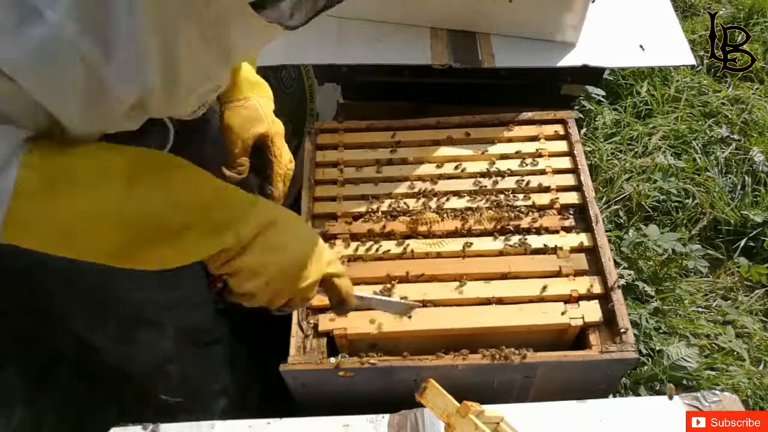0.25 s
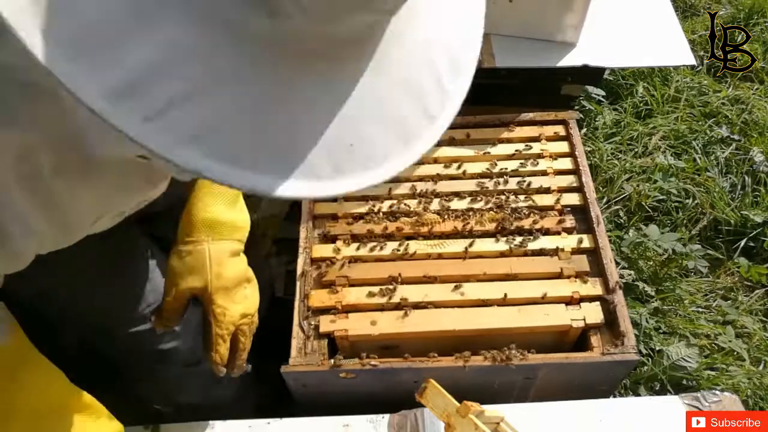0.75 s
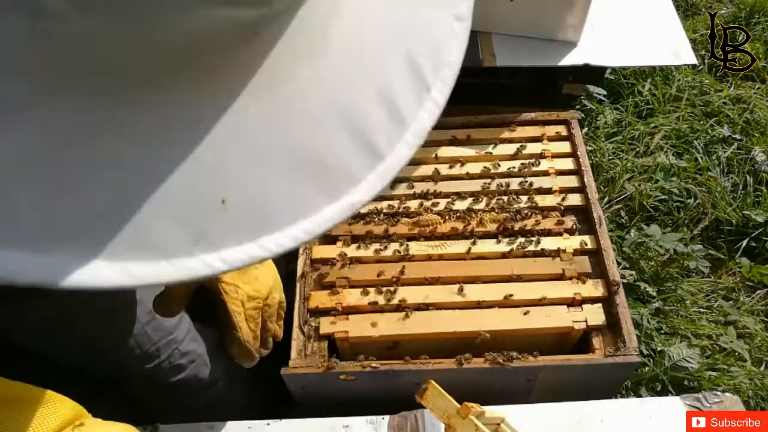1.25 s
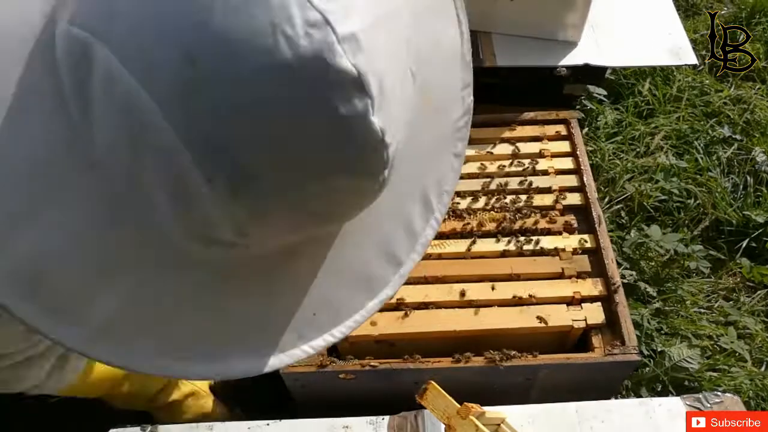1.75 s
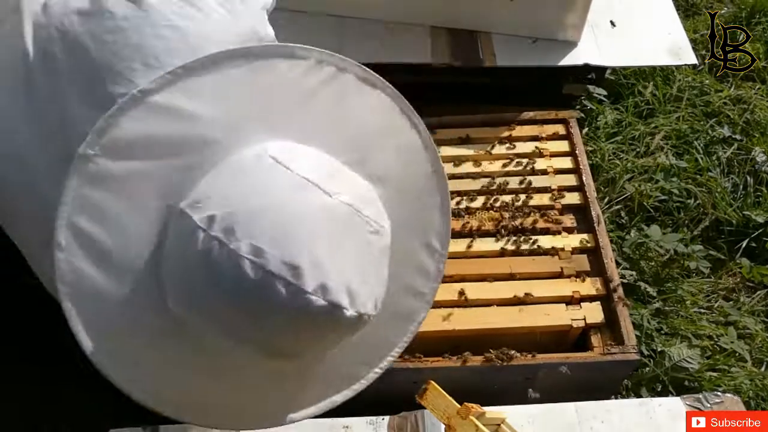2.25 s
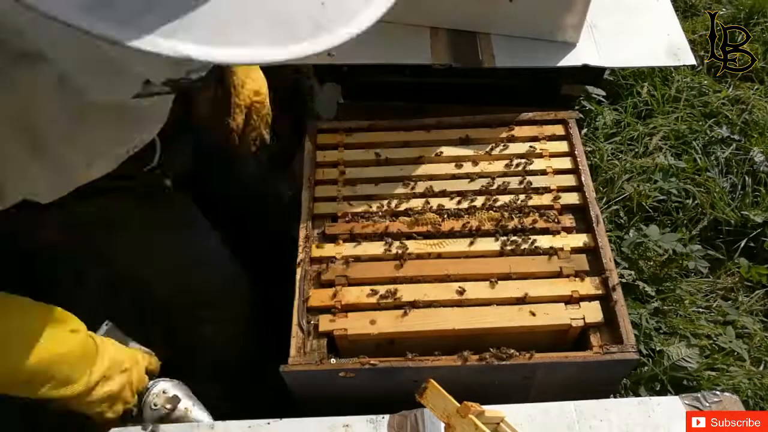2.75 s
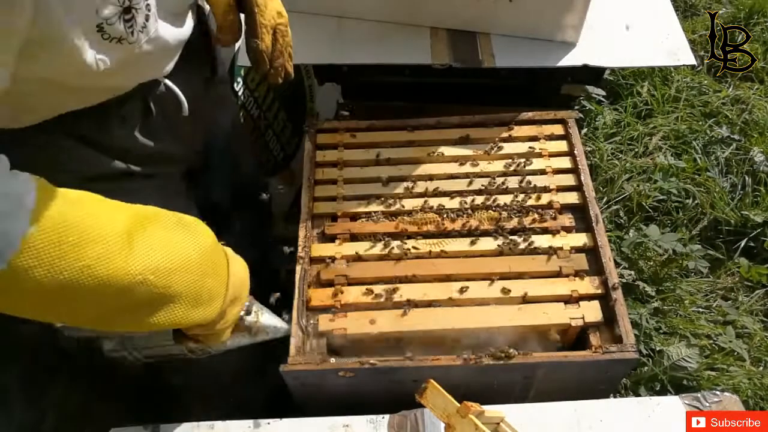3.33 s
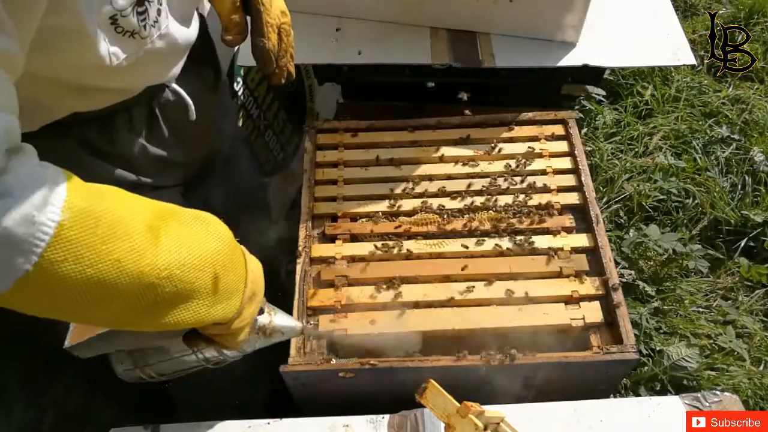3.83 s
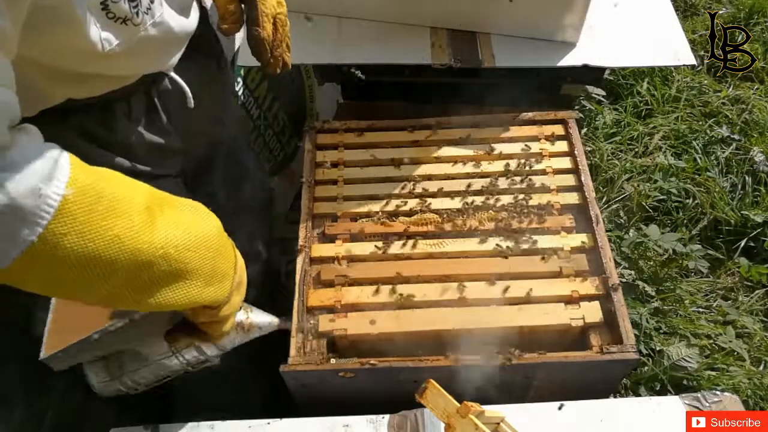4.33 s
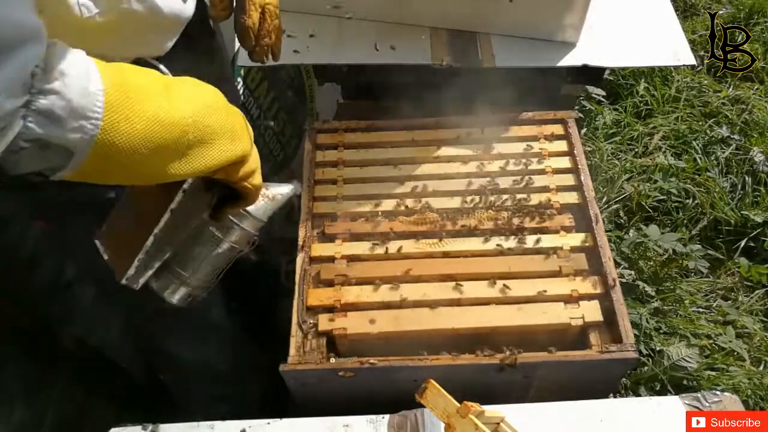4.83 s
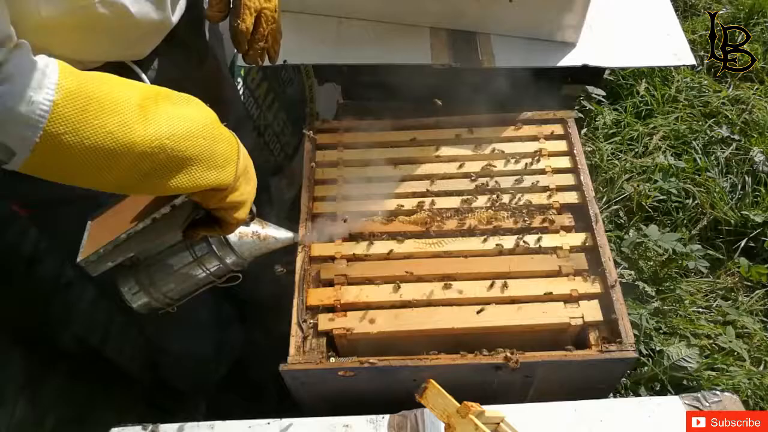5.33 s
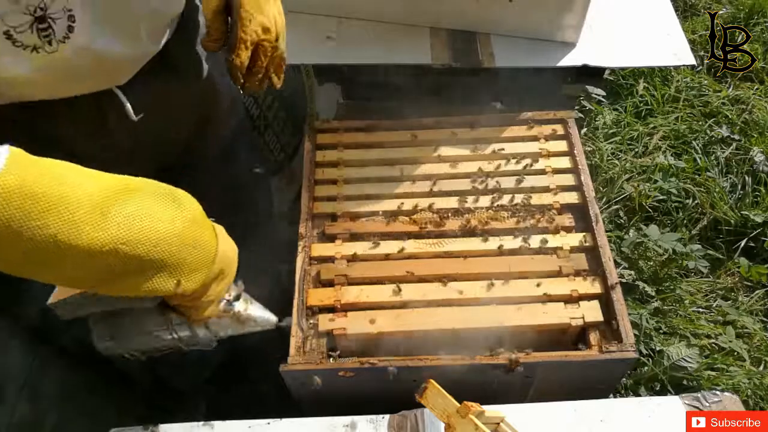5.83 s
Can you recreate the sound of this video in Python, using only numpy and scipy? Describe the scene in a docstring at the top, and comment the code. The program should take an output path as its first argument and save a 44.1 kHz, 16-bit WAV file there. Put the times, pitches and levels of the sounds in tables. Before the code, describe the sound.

Quiet garden air with a faint hive buzz. Hollow wooden knocks come first, then a sharp steel clatter that rings for a moment. Two seconds later a smoker is pumped quickly nine times, whooshing through its spout with rumbling bellows and soft air intake between. The colony answers with a growing fine hiss, and one bee hums past faintly near the end. Close microphones, dry and open.

```python
"""Outdoors at an open beehive, a steel hive tool bumps the wooden frames and drops on a lid, clattering and ringing.
A bellows smoker is then pumped nine times: each squeeze is a rumble and a jet of turbulent noise through a
resonant spout. Its leather buckles softly and its hinge creaks around the second squeeze.
The colony answers the smoke with a rising noise hiss and a soft buzz, and one bee passes close as a
wavering tone, over the steady filtered noise of a quiet garden."""
import sys
import numpy as np
from scipy import signal
from scipy.fft import rfft, irfft, next_fast_len
from scipy.io import wavfile
from scipy.ndimage import map_coordinates

SR = 44100
rng = np.random.default_rng(int(sys.argv[2]) if len(sys.argv) > 2 else 0)


def to_wav(sig):
    """Store sig (one row per channel, or 1-D mono) as 16-bit WAV at the path in sys.argv[1].

    Samples outside -1..1 are clipped; the rate is SR.
    """
    pcm = np.clip(np.atleast_2d(sig), -1, 1) * 32767
    pcm = np.round(pcm).astype(np.int16)
    wavfile.write(sys.argv[1], SR, pcm.T)  # frames by channels


N = 268524  # length in samples


def amp(db):
    """Decibels to an amplitude factor."""
    return 10 ** (np.asarray(db) / 20)


def unit(x):
    """Scale to rms 1."""
    return x / np.sqrt(np.mean(x ** 2) + 1e-20)


def along(points, hz):
    """Each column of a (Hz, ..) table, read on a log frequency axis."""
    f, *cols = np.transpose(points)
    return np.array([np.interp(np.log(hz + 1), np.log(f + 1), c) for c in cols])


def wobble(rate):
    """A smooth random curve over the whole scene, rate knots a second."""
    knots = rng.standard_normal(int(N * rate / SR) + 4)
    return map_coordinates(knots, [np.arange(N) * rate / SR])


def filtered(x, response):
    """x times a response of frequency."""
    n = x.shape[-1]
    m = next_fast_len(n + 4096)  # padded against wrap-around
    return irfft(rfft(x, m) * response(np.fft.rfftfreq(m, 1 / SR)), m)[..., :n]


def noise(spectrum, field, size=N):
    """Coloured stereo noise of rms 1; the field sets how alike it reaches the two microphones."""
    hz = np.fft.rfftfreq(size, 1 / SR)
    alike, pan_db, lead = along(field, hz)
    turn = np.arccos(np.clip(alike, 0, 1)) / 2
    sources = rfft(rng.standard_normal((2, size)))
    shared, differing = sources * [np.cos(turn), np.sin(turn)] * amp(along(spectrum, hz))
    left = amp(pan_db / 2) * np.exp(.5j * lead)
    return unit(irfft(np.array([(shared + differing) * left, (shared - differing) / left]), size))


def stroke(t, length):
    """The hand's squeeze: one smooth arch, zero before and after."""
    return np.abs(np.sin(np.pi * np.clip(t / length, 0, 1)))


def add(track, s, sound):
    """Mix a sound in at time s in seconds."""
    part = track[:, round(s * SR):][:, :sound.shape[1]]
    part += sound[:, :part.shape[1]]


# How sound from the hive and smoker reaches the microphone pair.
# Each row: frequency in Hz, likeness of the two sides 0-1, left-right in dB, left lead in radians.
NEAR_FIELD = [(99, 1, -2.5, -0.06), (380, 0.92, 0, 1), (570, 0.47, 2.5, 2), (820, 0.7, 12, 2),
              (1410, 0.94, -1, 0.82), (1900, 0.88, -7.5, 1.7), (2170, 0.92, -3.5, 2), (3630, 0.54, 4, 1.5),
              (14700, 0, 0.5, 1.5)]


def ring(t, hz, t60, pan_db, phase):
    """One mode dying by 60 dB in t60 seconds, with a level and phase difference between the microphones."""
    side = np.array([[.5], [-.5]])
    lead = along(NEAR_FIELD, hz)[2]
    swing = np.sin(2 * np.pi * hz * t + phase + side * lead)
    return amp(side * pan_db) * swing * np.exp(-np.log(1000) * t / t60)


# Steel touching the lid.
# Each row: start in seconds, strength in dB, place from hook 0 to blade 1, highest Hz the contact excites.
TOOL_CONTACTS = [(1.1327, 7.5, 0, 4070), (1.1447, 0.5, 0.21, 19000), (1.152, 0.5, 0.18, 19000),
                 (1.162, -4, 0, 15000), (1.171, -3.5, 0.3, 14000), (1.2115, 3.5, 0, 855),
                 (1.2275, 2, 0.96, 18000)]
# The modes of the hive tool, levels relative to the contact's strength.
# Each row: frequency in Hz, t60 in seconds, dB struck at the hook, dB struck at the blade, left-right in dB.
STEEL_MODES = [(630, .09, -42, -53, 8), (733, 1.02, -56, -50.5, 10), (770, .3, -53, -52, 10),
               (1141, .11, -46, -34, 3), (1620, .09, -39, -42, 0), (1863, .28, -57, -48, 7),
               (2374, .19, -53, -46, 2), (2404, .19, -46, -48, 3), (2729, .3, -57, -54, 1),
               (3478, .29, -51, -51, 6), (3547, .14, -45, -59, 6), (3753, .29, -53, -51, 6),
               (4090, .1, -62, -51, 2), (4662, .27, -58, -55, 2), (4973, .31, -56, -50, 6),
               (5714, .36, -78, -53, 8), (6380, .18, -52, -56, 1), (6691, .25, -50, -60, 4),
               (8000, .13, -52, -57, 0), (8788, .15, -63, -42, 14), (9530, .14, -51, -60, 6),
               (9997, .09, -44, -52, 14), (10346, .14, -62, -35, 17), (11360, .09, -46, -48, 6),
               (11843, .13, -45, -63, 3), (13222, .12, -42, -53, 3), (14360, .13, -48, -64, -2),
               (14720, .14, -68, -52, 2)]
# The tick of steel touching the lid. Each row: frequency in Hz, relative level in dB.
CRACK_SPECTRUM = [(700, -2), (2000, -4), (4000, -12), (7500, -16), (10500, -8), (12500, -14), (15000, -15)]
# The lid's rattle. Each row: frequency in Hz, relative level in dB.
LID_SPECTRUM = [(90, -3.5), (220, 4.5), (480, -8.5), (720, 6), (980, -8), (1350, -26), (1650, -14),
                (2200, -15), (4600, -20), (7300, -26), (10300, -24), (13000, -31)]


def hive_tool():
    """The hook lands and chatters, then the blade falls; each end favours other modes of the steel."""
    out, t = np.zeros((2, N)), np.arange(SR) / SR
    knots = np.linspace(0, 1, num=250)  # seconds
    for s, db, place, top_hz in TOOL_CONTACTS:
        # each touch damps the ring before it
        out = out * np.interp(np.arange(N) / SR, [s, s + .004], [1, amp(-2.5)])
        soft = lambda hz: 1 / np.sqrt(1 + (hz / top_hz) ** 10)  # a soft contact excites less treble
        steel = 0
        for hz, t60, hook_db, blade_db, pan_db in STEEL_MODES:
            # the hook skids on the lid and roughens the ring; the blade rings more freely
            jitter = np.interp(t, knots, rng.standard_normal(len(knots)))
            skid = (.7 - 0.52 * place) * np.exp(-t / 0.33) * jitter
            level_db = hook_db + place * (blade_db - hook_db)
            phase = rng.uniform(0, 2 * np.pi) + skid
            steel = steel + amp(level_db) * soft(hz) * ring(t, hz, t60, pan_db, phase)
        crack = amp(-36.5) * noise(CRACK_SPECTRUM, NEAR_FIELD, len(t)) * np.exp(-t / 0.0021)
        rattle = amp(-44.5) * noise(LID_SPECTRUM, NEAR_FIELD, len(t)) * np.exp(-t / 0.081)
        # it buzzes against the lid until it lies still
        chatter = amp(3 * wobble(350)[:len(t)] * np.exp(-t / .06))
        onset = 1 - np.exp(-t / .0012)
        add(out, s, amp(db) * (steel + filtered(crack + rattle, soft)) * chatter * onset)
    return out


# Blows on the wooden frames, at the hive.
# Each row: start in seconds, level in dB, pitch in Hz, t60 in seconds,
# click in dB relative to the level before a common 12.5 dB cut.
WOOD_KNOCKS = [(0.565, -39, 172, 0.042, -17), (0.5968, -34, 121, 0.075, 2), (.603, -36, 274, 0.063, -24),
               (0.653, -37, 120, 0.073, -16), (0.9536, -22, 243, 0.077, -10.5),
               (0.9916, -27, 251.5, 0.088, -12), (1.131, -32.5, 196.8, 0.28, 2.5),
               (1.212, -30, 228, 0.1, -16), (3.35, -26, 204, 0.058, -41), (6.018, -34.5, 222, 0.04, -27)]
# The click of dry wood. Each row: frequency in Hz, relative level in dB.
CLICK_SPECTRUM = [(500, -5), (1200, 1), (1750, 3), (2400, -20), (3800, -19), (7000, -41)]
# The hive box's hollow answer. Each row: frequency in Hz, relative level in dB.
BOX_SPECTRUM = [(60, -13.5), (130, -2.5), (280, 3.5), (500, -15), (1500, -23.5), (4000, -43)]


def knocks():
    """Each blow gives a dry click and a short boom of two modes; the loose frames shudder in the box."""
    out, t = np.zeros((2, N)), np.arange(SR // 2) / SR
    for s, db, hz, t60, click_db in WOOD_KNOCKS:
        boom = ring(t, hz, t60, 0, 0) + amp(-13) * ring(t, 1.33 * hz, 0.56 * t60, 1, 0)
        shudder = amp(-19) * noise(BOX_SPECTRUM, NEAR_FIELD, len(t)) * np.exp(-t / .042)
        click_decay = np.exp(-t / 0.0023) + amp(-11.5) * np.exp(-t / 0.02)
        click = noise(CLICK_SPECTRUM, NEAR_FIELD, len(t)) * click_decay
        body = (boom + shudder) * (1 - np.exp(-t / 0.0029))
        add(out, s, amp(db) * (body + amp(click_db - 12.5) * click))
    return out


# Squeezes of the bellows.
# Each row: start in seconds, length in seconds, strength in dB, spout resonance in Hz,
# its height in dB, seconds until the inlet valve shuts.
PUFFS = [(3.014, 0.2, -41, 1540, 3, 0.025), (3.417, 0.15, -42.5, 1410, 4.5, 0.042),
         (3.746, .16, -40.5, 1480, 6, 0.046), (4.126, 0.16, -40, 1480, 5, 0.053),
         (4.463, .15, -39, 1440, 15, 0.029), (4.792, 0.15, -40, 1220, 16, .049),
         (5.167, 0.16, -44, 1366, 14.5, 0.052), (5.549, 0.16, -40.5, 1340, 7.5, 0.042),
         (5.866, 0.13, -42.5, 1440, 15, 0.037)]
# The jet's turbulence. Each row: frequency in Hz, relative density in dB per Hz.
JET_SPECTRUM = [(300, -55), (500, -6.5), (690, -10.5), (920, -1.5), (1120, -14), (1400, -1.5), (1800, -6),
                (2200, -21), (3200, -22), (6000, -65)]
# The rumbling bag. Each row: frequency in Hz, relative density in dB per Hz.
BELLOWS_SPECTRUM = [(60, -27), (120, -23.5), (180, -5), (250, -1.5), (340, -8), (430, -9.5), (560, -43),
                    (1000, -38)]
# The hiss of the fastest air. Each row: frequency in Hz, relative density in dB per Hz.
FIZZ_SPECTRUM = [(1200, -19), (2300, 13.5), (4200, 1), (10000, -1.5)]
RUMBLE_DB, RUMBLE_LONGER = -1.5, 1.073  # the bag over the puff's strength; its length over the puff's
FULL_STROKE_S = 0.16  # a squeeze longer than this holds the jet at full speed
SURGE_DB, SURGE_S = -7, 0.021  # as the inlet valve shuts, the jet surges and settles


def smoker():
    """Each squeeze rumbles in the bellows and drives a turbulent jet through the resonant spout."""
    jets, rumbles, t = np.zeros((2, N)), np.zeros((2, N)), np.arange(SR // 3) / SR
    for s, length, db, spout_hz, spout_db, valve_s in PUFFS:
        shut = np.maximum(t - valve_s, 0)  # seconds since the valve shut
        surge = amp(SURGE_DB) * (1 - np.exp(-shut / 0.0027)) * np.exp(-shut / SURGE_S)
        speed = np.minimum(stroke(t, length) * max(length / FULL_STROKE_S, 1), 1)
        flow = speed ** 1.32 * np.where(shut > 0, 1, amp(-1))  # air leaks until the valve shuts
        spout = lambda hz: amp(spout_db / (1 + ((hz - spout_hz) / 125) ** 2))
        air = unit(filtered(noise(JET_SPECTRUM, NEAR_FIELD, len(t)), spout))
        # the spout's note wanders with the hot smoke: the air is read at a wavering speed
        drift = np.cumsum(1 + .035 * wobble(35)[:len(t)])
        wandering = np.array([map_coordinates(side, [drift]) for side in air])
        jet = amp(-1.25) * wandering * (flow + surge)
        # only the fastest air hisses
        fizz = amp(-14) * noise(FIZZ_SPECTRUM, NEAR_FIELD, len(t)) * stroke(t - .005, length) ** 3
        bag = noise(BELLOWS_SPECTRUM, NEAR_FIELD, len(t))
        chop = unit(amp(2.5 * bag[0]))  # the trembling bag chops the jet
        add(jets, s, amp(db) * chop * (jet + fizz))
        # the bag settles just after the jet
        rumble = bag * stroke(t, RUMBLE_LONGER * length) ** 1.09
        add(rumbles, s, amp(db + RUMBLE_DB) * rumble)
    flutter = unit(amp(1.2 * wobble(170)))  # the leather flutters
    return flutter * (jets + amp(1.26 * wobble(60)) * rumbles)


def refill():
    """After each squeeze the spring opens the bellows and they draw air softly."""
    out, t = np.zeros((2, N)), np.arange(SR // 3) / SR
    draw = stroke(t, t[-1]) * np.exp(-t / 0.05)
    # Each row: frequency in Hz, relative density in dB per Hz
    inlet = [(100, 0), (550, -2.0), (1000, -11.0), (1500, 4), (2300, -18), (9000, -47)]
    for s, length, *_ in PUFFS:
        air = noise(inlet, NEAR_FIELD, len(t))
        add(out, s + length - .03, amp(-47.5) * draw * air)
    return out


# Folds of the smoker's leather buckling. Each row: start in seconds, level in dB.
LEATHER_FLAPS = [(3.142, -24.5), (3.842, -28), (4.187, -29), (4.253, -33.5), (4.862, -27.5), (5.268, -31),
                 (5.607, -30)]
FLAP_HZ, FLAP_T60_S = 247, 0.062


def flaps():
    """A fold of the leather buckles under the hand with a soft, hollow thump: one short, slow-starting mode."""
    out, t = np.zeros((2, N)), np.arange(SR // 4) / SR
    for s, db in LEATHER_FLAPS:
        add(out, s, amp(db) * ring(t, FLAP_HZ, FLAP_T60_S, 0, 0) * (1 - np.exp(-t / .004)))
    return out


# Creaks of the smoker's hinge. Each row: time of the hardest slip in seconds, strain in dB.
HINGE_CREAKS = [(3.385, -47.5), (3.472, -50)]
CREAK_RISE_DB_PER_S, CREAK_FALL_DB_PER_S = 194, 520
SLIP_HZ = 221  # mean rate of slips


def creak():
    """The bellows' hinge sticks and slips: a quick train of thin, high ticks that swells and dies."""
    now = np.arange(N) / SR
    strain = 0
    for s, db in HINGE_CREAKS:
        below_db = np.maximum(CREAK_RISE_DB_PER_S * (s - now), CREAK_FALL_DB_PER_S * (now - s))
        strain = strain + amp(db - below_db)
    slip_count = np.floor(np.cumsum(SLIP_HZ * (1 + 0.015 * wobble(40))) / SR)
    slips = np.diff(slip_count, prepend=0)
    t = np.arange(SR // 200) / SR
    ticks = signal.fftconvolve(slips * amp(1.7 * wobble(200)), np.exp(-t / 0.0024))[:N]
    # Each row of the first list: Hz, relative dB; of the second: Hz, likeness, left-right dB, lead in radians
    squeak = noise([(6000, -28), (9000, -12), (11400, -2), (14000, -18)], [(10000, 0.58, 1, 0)])
    return strain * ticks * squeak


# Glove and tool brushing the hive.
# Each row: start in seconds, length in seconds, level in dB, centre in Hz.
HIVE_SCUFFS = [(0.555, 0.018, -54.5, 1560), (0.813, 0.12, -68.5, 9100)]


def scuffs():
    """Each brush is a soft swell of friction noise, about an octave wide."""
    out, t = np.zeros((2, N)), np.arange(SR // 4) / SR
    for s, length, db, hz in HIVE_SCUFFS:
        spectrum = [(hz / 4, -22), (hz, 0), (hz * 2, -18), (hz * 4, -45)]
        friction = noise(spectrum, NEAR_FIELD, len(t))
        add(out, s, amp(db) * stroke(t, length) * friction)
    return out


PASS_S, PASS_WIDTH_S = 5.29, 0.14  # when one bee is nearest; how long it stays near (sigma)
PASS_DB = -59.5  # its level there, before its wavering
WING_HZ, WING_RISE_HZ_PER_S = 210, 75  # its mean wingbeat when nearest; it quickens as the bee climbs


def passing_bee():
    """A wavering wingbeat swells and fades as the bee passes, heard mostly in its second harmonic."""
    t = np.arange(N) / SR - PASS_S
    nearness = np.exp(-.5 * (t / PASS_WIDTH_S) ** 2)
    beat_hz = (WING_HZ + WING_RISE_HZ_PER_S * t) * (1 + .06 * wobble(150))
    phase = 2 * np.pi * np.cumsum(beat_hz) / SR
    wings = unit(np.sin(2 * phase) + 0.15 * np.sin(phase))
    return amp(PASS_DB + 3 * wobble(30)) * nearness * wings


STARTLE_S, ROUSE_S = 0.0065, 0.38  # delay of the answer to a puff; time from there to its height


def unrest():
    """How roused the colony is, 0-1: each puff stirs it by its strength, and the stir slowly fades."""
    stir = np.zeros(N)
    for s, _, db, *_ in PUFFS:
        age = np.maximum(np.arange(N) / SR - s - STARTLE_S, 0) / ROUSE_S
        stir += amp(db) * age * np.exp(-age)
    return stir / stir.max()


# The colony's hiss. Each row: frequency in Hz, relative density in dB per Hz.
HISS_SPECTRUM = [(300, -50), (700, 2), (1200, 6), (4000, 0.5), (7000, 3.5), (11000, 4), (15000, 7)]
# The colony's buzz. Each row: frequency in Hz, relative density in dB per Hz.
BUZZ_SPECTRUM = [(200, -15), (400, 3), (560, -11), (1300, -8), (2500, -28.5)]
# How the wide sound of colony and garden reaches the microphone pair.
# Each row: frequency in Hz, likeness of the two sides 0-1, left-right in dB, left lead in radians.
WIDE_FIELD = [(96, 1, -0.32, 0), (296, 0.9, -0.96, 0.01), (603, 0, 1, 0.017), (795, 0.092, 0.94, 0),
              (1360, 0.68, 0.22, 0.034), (2080, 0, -0.46, 0)]
HISS_DB, HISS_GROWS = -49, 1.47  # mean level fully roused; how steeply it grows with the unrest (exponent)
CALM_BUZZ_DB, BUZZ_DB = -69, -62  # the buzz at rest; what full unrest adds to it


def bees():
    """Smoked bees fan their wings: thousands of them blur into a hiss and a buzz."""
    roused = unrest()
    sway_db = .7 * wobble(14)
    hiss = amp(HISS_DB + sway_db) * roused ** HISS_GROWS * noise(HISS_SPECTRUM, WIDE_FIELD)
    buzz_level = amp(CALM_BUZZ_DB) + amp(BUZZ_DB) * roused ** 2
    buzz = buzz_level * amp(0.88 * wobble(17)) * noise(BUZZ_SPECTRUM, WIDE_FIELD)
    return hiss + buzz


# The open air of the garden. Each row: frequency in Hz, relative density in dB per Hz.
GARDEN_SPECTRUM = [(15, -8), (34, 3.5), (110, -7), (360, -11), (600, -17), (1350, -15), (2200, -21.5),
                   (7000, -30.5), (15000, -26.5)]


def garden():
    """Faint, nearly steady outdoor air: wide coloured noise whose level sways slightly."""
    sway_db = .6 * wobble(6)
    return amp(-60.0 + sway_db) * noise(GARDEN_SPECTRUM, WIDE_FIELD)


# The microphone ports. Each row: frequency in Hz, left gain in dB, right gain in dB.
PORT_GAINS = [(3500, 1, 1), (8450, -0.5, -3.5), (10640, 6, -3.5), (13100, -4.5, -4), (17300, -12, 6)]


def scene():
    """Smoker, bees and garden are coloured by the microphone ports; tool, knocks and scuffs join unaltered."""
    puffing = smoker() + flaps() + refill() + creak()
    airy = puffing + bees() + passing_bee() + garden()
    airy = filtered(airy, lambda hz: amp(along(PORT_GAINS, hz)))
    return airy + scuffs() + knocks() + hive_tool()


TOP_HZ = 15560  # upper band limit


def record(dry):
    """A steep low-pass keeps nothing above the band limit."""
    return filtered(dry, lambda hz: hz < TOP_HZ)


dry = scene()
out = record(dry)
to_wav(out)
```